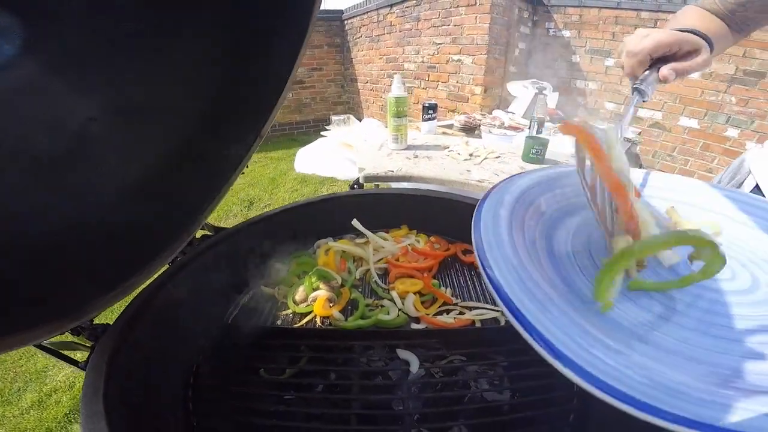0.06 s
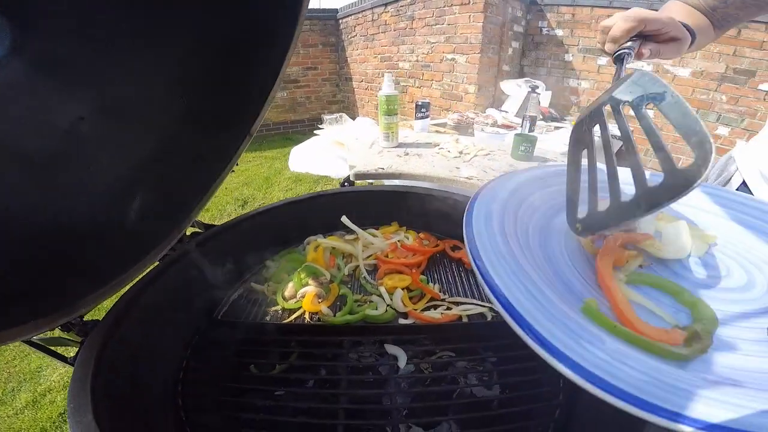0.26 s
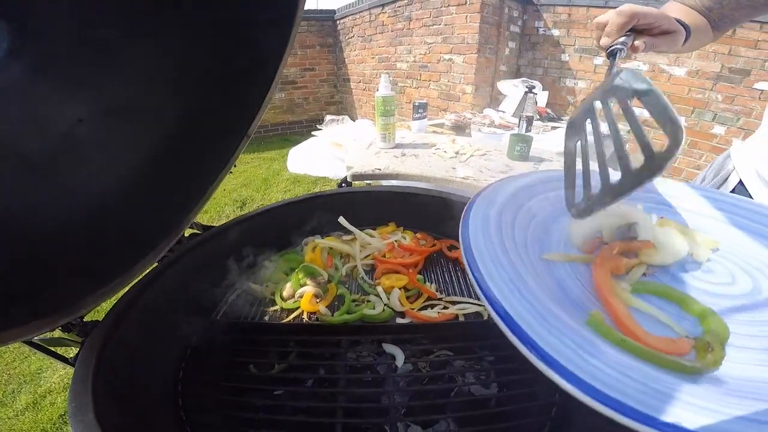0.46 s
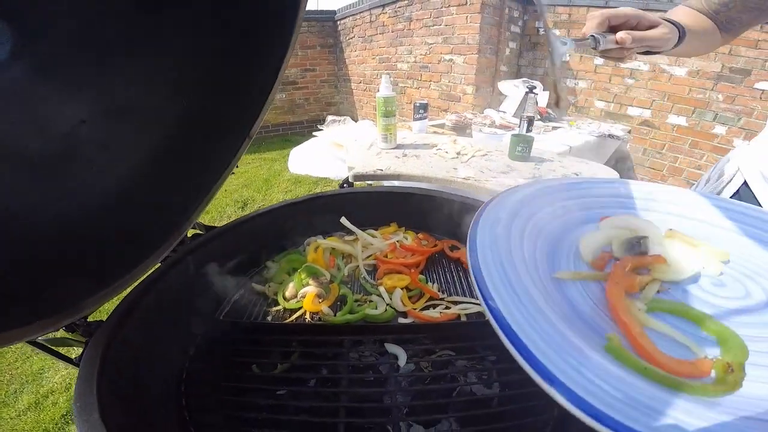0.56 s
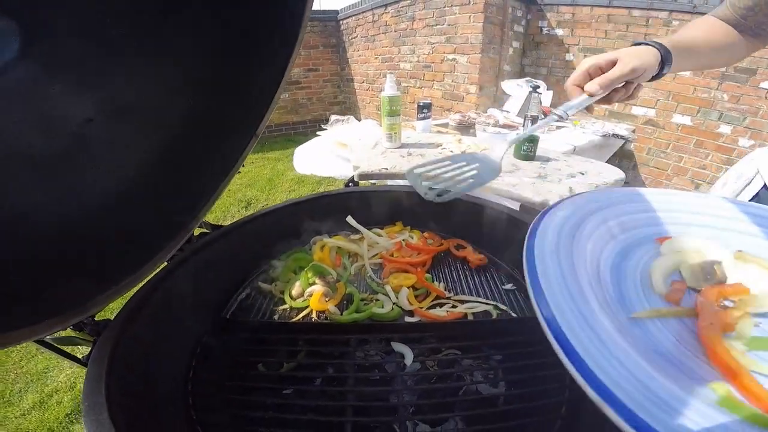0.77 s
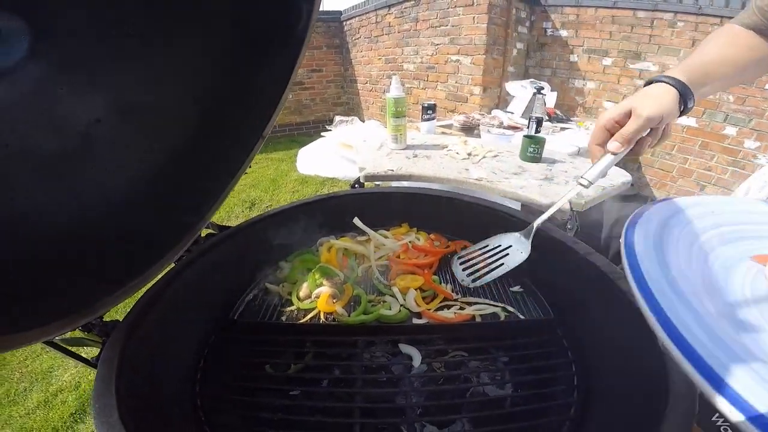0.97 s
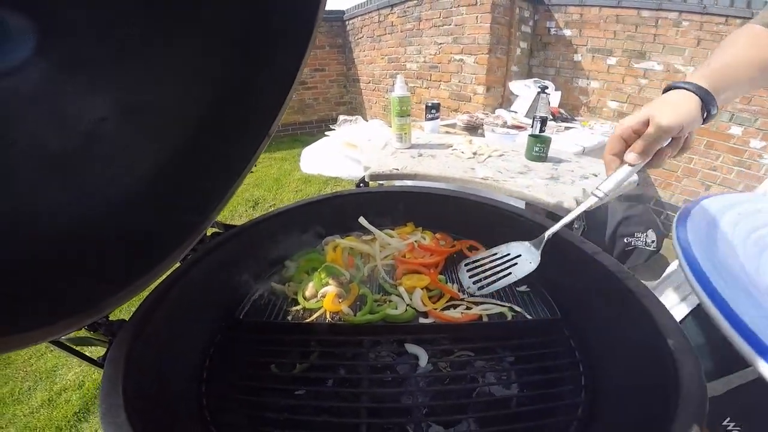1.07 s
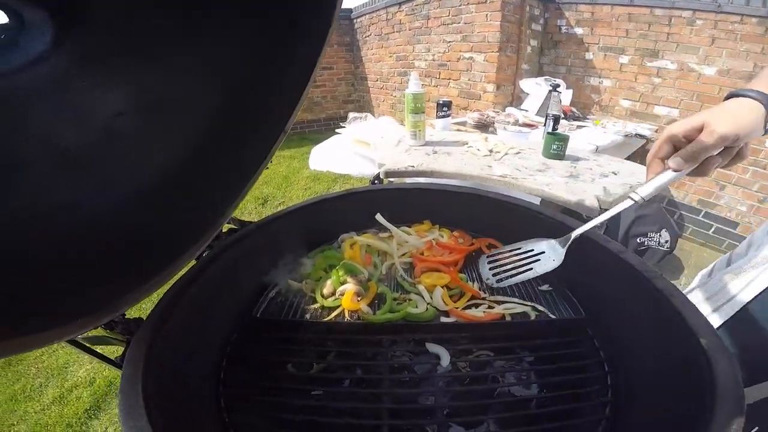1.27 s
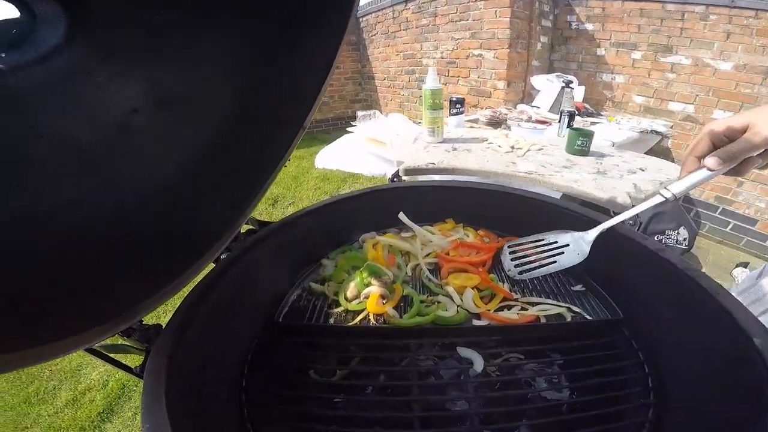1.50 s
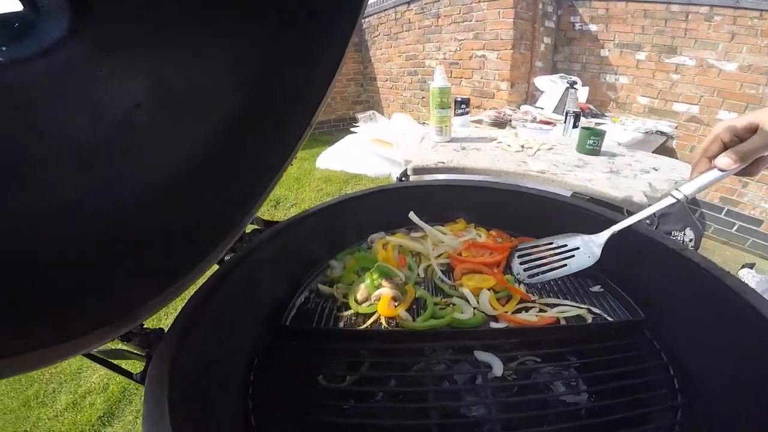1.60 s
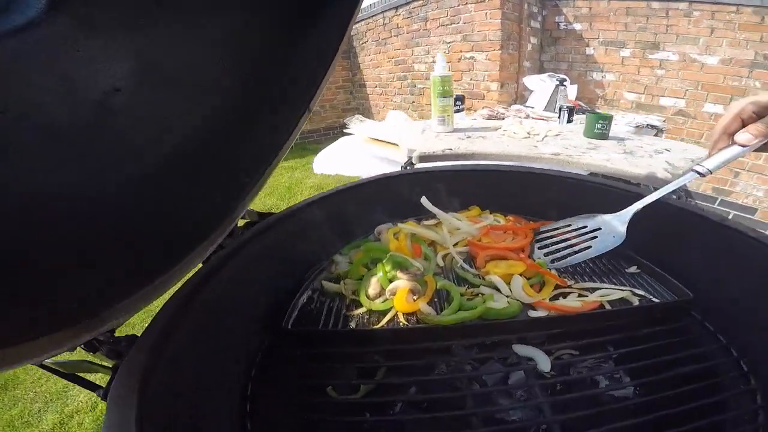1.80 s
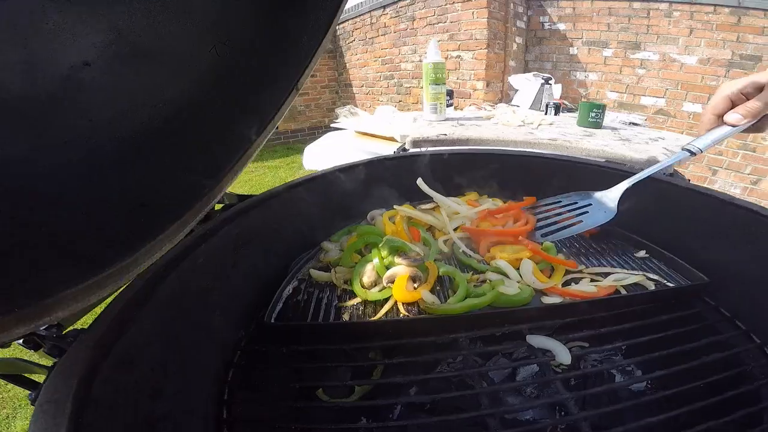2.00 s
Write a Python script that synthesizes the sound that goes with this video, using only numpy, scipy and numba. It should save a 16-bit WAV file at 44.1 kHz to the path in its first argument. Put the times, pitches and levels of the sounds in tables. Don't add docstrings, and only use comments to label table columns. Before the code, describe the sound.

Slotted metal turner clacks against a plate, then clanks on grill bars over faint sizzling outdoors

```python
import sys
import numpy as np
from scipy import signal
from scipy.io import wavfile
from scipy.ndimage import uniform_filter1d
from numba import njit

SR = 44100
rng = np.random.default_rng(int(sys.argv[2]) if len(sys.argv) > 2 else 0)


def unload_audio(sound):
    columns = np.transpose(np.atleast_2d(sound))
    steps = np.round(np.clip(columns, -1, 1) * 32767)
    wavfile.write(sys.argv[1], SR, steps.astype(np.int16))


def invert_db(level):
    return 10 ** (np.asarray(level, dtype=float) / 20)


N = 90404

# t/s, peak level/dB, contact time/s, clatter level/dB, share of the kettle/dB
GRATE_TAPS = [
    (1.1024, -20.5, 0.0017, -14, -25.5),
    (1.3967, 1.5, 0.00183, -23.5, -42.5),
    (1.697, -13, 0.00292, -11.5, -22),
    (1.7372, 1.5, 0.00095, -22.5, -39.5),
]
BARS_HZ = [549, 660, 990, 1227, 1675, 1933, 2021, 2160, 2430, 2850, 3117, 3210, 3547, 3716]
BARS_T60 = [0.098, 0.048, 0.085, 0.038, 0.18, 0.075, 0.093, 0.11, 0.1, 0.026, 0.11, 0.15, 0.038, 0.062]


def level(x, db):
    return x * invert_db(db) / np.sqrt(np.mean(x ** 2))


def band(x, hz, width):
    half = np.sqrt(1 + (width / hz / 2) ** 2) + width / hz / 2
    edges = [hz / half, min(hz * half, SR / 2.1)]
    return signal.sosfilt(signal.butter(2, edges, "band", fs=SR, output="sos"), x)


def walk(rate):
    hold = int(SR / rate)
    steps = np.repeat(rng.standard_normal(N // hold + 1), hold)
    return 1.3 * uniform_filter1d(uniform_filter1d(steps, hold), hold)[:N]


def add(out, at_s, x):
    i = int(at_s * SR)
    out[i:i + len(x)] += x[:N - i]


def fade(t, t60):
    return 1000. ** (-t / t60)


def ring(hz, db, t60, length_s=1.0):
    t = np.arange(int(length_s * SR)) / SR
    turn = rng.random((len(hz), 1))
    hz, db, t60 = (np.array(v, float)[:, None] for v in (hz, db, t60))
    partials = invert_db(db) * np.sin(2 * np.pi * (hz * t + turn)) * fade(t, np.clip(t60, .01, 1.2))
    return np.sum(partials, axis=0)


def coloured(points, flicker_db):
    hz, db = np.array(points, float).T
    count = int(3 * np.log2(hz[-1] / hz[0])) + 1
    out = np.zeros(N)
    for f in np.geomspace(hz[0], hz[-1], num=count):
        band_db = np.interp(np.log(f), np.log(hz), db) + flicker_db * walk(11.36)
        out += invert_db(band_db) * band(rng.standard_normal(N), f, f / 4)
    return out


def blows(hits, rings, clatter):
    out, t = np.zeros(N), np.arange(SR // 2) / SR
    crack = invert_db(-2) * fade(t, 0.078)
    for (at_s, peak_db, contact_s, clatter_db, *_), bodies in zip(hits, rings):
        blow = bodies / 2
        for f, db, t60 in clatter:
            noise = band(band(rng.standard_normal(len(t)), f, 0.6 * f), f, f)
            add(blow, 0, level(noise, db + clatter_db - 6.5) * (crack + fade(t, t60)))
        contact = np.minimum(np.arange(len(blow)) / SR / contact_s, 1) ** 1.12
        add(out, at_s, invert_db(peak_db) * blow * contact)
    return out


def sizzle():
    # f/Hz, density/dB
    hiss_bands = [(1500, -11), (2500, 0), (4000, 0), (5500, 2), (7000, -7.5), (10000, -4), (13000, -4.5),
                  (15500, -13)]
    bubbles_per_s = 530
    bursts = rng.random(N) < bubbles_per_s / SR
    pops = bursts * invert_db(2 * rng.exponential(size=N)) * np.sign(rng.standard_normal(N))
    return level(coloured(hiss_bands, 1.5), -46) + level(band(pops, 4320, 4550), -52)


def garden_air():
    # f/Hz, density/dB
    air_bands = [(25, -3.5), (60, -2.5), (125, -9), (175, -14.5), (400, -29.5), (600, -26), (1200, -31),
                 (2500, -36.5)]
    return level(coloured(air_bands, 3.3), -40.5)


def breeze():
    # t/s, level/dB
    gusts = [
        (0, 1),
        (.4, 0.5),
        (.62, -1),
        (.95, 0),
        (1.3, -0.5),
        (1.6, 3),
        (2.05, 5.5),
    ]
    return invert_db(np.interp(np.arange(N) / SR, *np.array(gusts).T))


def far_engine():
    # t/s, firing f/Hz, level/dB
    path = [
        (0, 86.2, -39),
        (.2, 83.43, -36.5),
        (.5, 84.56, -42.5),
        (.8, 79.48, -43),
        (1.05, 86.06, -46),
        (1.299, 76.46, -37),
        (1.5, 70.2, -46.5),
        (1.8, 64.7, -38.5),
        (2.05, 63.2, -41),
    ]
    t, (at_s, hz, db) = np.arange(N) / SR, np.array(path).T
    firing_hz = np.interp(t, at_s, hz) * (1 + 0.0098 * walk(15.14))
    engine_db = np.interp(t, at_s, db) + 2.0 + 0.57 * walk(20.5)
    return invert_db(engine_db) * np.sin(2 * np.pi * np.cumsum(firing_hz) / SR)


def slides():
    # t/s, length/s, level/dB, colour f/Hz
    strokes = [
        (.03, 0.03, -38, 4700),
        (.44, 0.028, -39.5, 8000),
        (1.091, 0.0407, -29, 2850),
        (1.093, 0.043, -32.5, 12400),
    ]
    scraped_db = [-5.5, -6.5, -12, -5, -30, -3.5, -33, -10.5, -12, -24, -6, -18, -35, -4.5]
    out, size = np.zeros(N), SR // 4
    bars = ring(BARS_HZ, scraped_db, BARS_T60)
    for k, (at_s, length_s, db, hz) in enumerate(strokes):
        grains = rng.standard_normal(size) * invert_db(0.5 * rng.exponential(size=size))
        phase = np.minimum(np.arange(size) / SR / length_s, 1)
        stroke = np.abs(np.sin(np.pi * phase)) ** 0.15 * (1 - phase) ** .5
        grit = level(grains, 0) * stroke * invert_db(2 * walk(217)[:size])
        add(out, at_s, invert_db(db) * band(grit, hz, 1.45 * hz))
        if k == 2:
            rung = signal.fftconvolve(grit * (1 - phase) ** 0.24, bars)
            loudest = np.sqrt(np.max(uniform_filter1d(rung ** 2, size=900)))
            add(out, at_s, invert_db(-26.5) * rung / loudest)
    return out


def spits():
    # t/s, peak level/dB, colour f/Hz, bandwidth as share of the colour
    noise_pops = [(0.275, -29.5, 1028, 1.25), (0.279, -32, 1480, 0.69), (0.49, -6, 705, 1.15),
                  (.345, -33.5, 510, 2.6), (.684, -38, 12500, .5), (.686, -43, 3200, .4), (.698, -40, 13600, .5),
                  (.73, -41, 12500, .4), (.746, -33.5, 9000, 1.3), (.774, -42, 9500, .3),
                  (.785, -29.5, 4000, 0.8), (0.806, -33, 4000, .6), (0.816, -39, 5500, 0.26),
                  (.871, -35, 11300, .6), (0.882, -32, 4360, 0.46), (.909, -30.5, 4000, 0.49),
                  (1.079, -30, 4660, 0.64), (1.1033, -12.5, 680, 0.53), (1.093, -25, 4000, 0.7),
                  (1.104, -23, 12570, 0.35), (1.309, -33.5, 2200, 1.1), (1.566, -27, 3800, 0.95),
                  (.152, -17, 208, 0.82), (0.058, -46, 3000, .4), (.325, -37, 2750, .3)]
    out, t = np.zeros(N), np.arange(2000) / SR
    for at_s, db, hz, share in noise_pops:
        burst = rng.standard_normal(len(t)) * np.sqrt(t) * fade(t, 0.0095)
        pop = band(burst, hz, share * hz)
        add(out, at_s - .001, invert_db(db) * pop / np.abs(pop).max())
    return out


def plate_knocks():
    # t/s, peak level/dB, contact time/s, clatter level/dB
    knocks = [
        (.1511, 9, 0.0012, -22),
        (.4885, 9, 0.0014, -19.5),
    ]
    # f/Hz, level/dB, t60/s
    clatter = [(175, -9, 0.057), (390, -9, 0.023), (797, -10.5, 0.033), (2010, -13, 0.28), (4000, -2, 0.12),
               (7160, -9.5, 0.071), (11500, -3, 0.065), (15050, -30, 0.038)]
    # f/Hz; t60/s; level/dB, one row per knock
    plate_hz = [165, 1066, 1735, 1764, 2620, 2850, 3402, 3360, 4515, 4597, 4893, 5965, 6775, 10700]
    plate_t60 = [0.034, 0.074, 0.027, 0.054, 0.046, 0.039, 0.095, 0.047, 0.076, 0.036, 0.016, 0.05, 0.04,
                 0.049]
    plate_db = [
        [-19, -3.5, -2.5, 4, -15.5, -27, -6, -9, -9, -2, -8, -21, -14.5, -19],
        [-10, -8.5, -8.5, -1, -1, -3, -25, -7.5, -12, -3, -7, -12.5, -20, -23],
    ]
    # f/Hz; t60/s; level/dB, one row per knock
    turner_hz = [1066, 1314, 1755, 2051, 3607, 4594, 5243, 5649, 5782, 6535, 8040, 9803, 10010]
    turner_t60 = [0.15, 0.23, 0.46, 0.3, 0.98, 0.27, 0.15, 0.35, 0.15, 0.13, 0.1, 0.14, 0.16]
    turner_db = [
        [-21.5, -58, -38.5, -50.5, -54.5, -37, -39.5, -46.5, -34.5, -26.5, -59, -44.5, -45.5],
        [-17.5, -38, -37, -34, -43, -26.5, -26.5, -27, -22, -49, -29, -38, -28],
    ]
    # f/Hz; t60/s; level/dB, one row per knock
    rim_hz = [310, 700, 1920, 2075, 2740, 3070, 3450, 3667, 3785, 4340, 4430, 4750]
    rim_t60 = [0.033, 0.02, 0.045, .06, 0.04, 0.049, .05, 0.045, 0.032, 0.061, 0.041, 0.046]
    rim_db = [
        [-27.5, -30, -6, -15.5, -26.5, -30, -13, -26, -24.5, -25, -17.5, -13],
        [-15, -6, -17, -30, -8.5, -23, -11, -24, -14, -11, -8, -22],
    ]
    rings = [ring(plate_hz, a, plate_t60) + ring(turner_hz, b, turner_t60) + ring(rim_hz, c, rim_t60)
             for a, b, c in zip(plate_db, turner_db, rim_db)]
    return blows(knocks, rings, clatter)


def blade_brushes():
    # t/s, length/s, level/dB, skew (under 1 peaks early)
    brushes = [
        (.692, 0.073, -40.5, .9),
        (.778, 0.1, -46.5, 0.31),
    ]
    out, t = np.zeros(N), np.arange(SR // 4) / SR
    for at_s, length_s, db, skew in brushes:
        swell = np.abs(np.sin(np.pi * np.minimum(t / length_s, 1) ** skew)) ** 0.62
        add(out, at_s, invert_db(db) * np.sin(2 * np.pi * 3630 * t) * swell)
    return out


def grate_taps():
    # f/Hz, level/dB, t60/s
    clatter = [(144.2, -16.5, 0.39), (246, -6.5, 0.39), (770, -9, 0.43), (1330, -2, 0.41), (2200, 0, 0.32),
               (3720, 3, 0.2), (6140, -5, .1), (8750, -9, 0.076), (13700, -10, 0.23)]
    # level/dB, one row per tap
    bars_db = [
        [-24, -11, -27, -3, -34, -13, -26, -16, -5, -25, -11, -31, -23, -13],
        [-12.5, -5, -20, -7, -16.5, -20, -26, -12.5, -8, -8, -8.5, -19, 1, 2],
        [3, 2, -3, -7, -18, -21, -11, -9, 2, -3, 1, -5, -7, 0],
        [-15.5, -4, -43, -3, -15.5, -41, -4.5, -29, -7, 0.5, -16, -26, -5, -13],
    ]
    # f/Hz; t60/s; level/dB, one row per tap
    blade_hz = [1015, 2552, 3880, 4021, 4414, 4612, 5270, 5430, 6115]
    blade_t60 = [0.11, 0.052, 0.057, 0.078, 0.077, 0.047, 0.051, 0.049, 0.1]
    blade_db = [
        [-2, -1, -26, -18, -22, -27, -5, -11, -14],
        [-12.5, -17, -8, -35, -14.5, -20, -34, -20, -35],
        [-6, -28, 1.5, -27, -29, -8, -19, 0.5, -12],
        [-23, -6, -3, -34, -22, -3.5, -15, -20, -26],
    ]
    # f/Hz; t60/s; level/dB, one row per tap
    rods_hz = [735, 876, 1340, 1564, 1846, 2083, 2233, 2379, 2821, 3144, 3225, 3930, 4409, 4953]
    rods_t60 = [0.08, 0.19, 0.26, .15, 0.23, 0.23, 0.098, 0.11, 0.24, 0.13, 0.29, 0.14, 0.21, 0.11]
    rods_db = [
        [5, -12, -14, -36, -33, -31, -29, -20, -29, -17, -27, -7, -25, -10],
        [-15.5, -25, -22, -24, -25, -26, -16, -22, -26.5, -9, -24, -37, -24, -35],
        [-25, -26, -17, -18, -26, -32, -9, -15, -14, -21, -18, -20, -33, -25],
        [-9, -45, -24.5, -21, -36, -32, -11, -9, -26, -17, -26, -13.5, -38, -20],
    ]
    thin_band = [345, 465]
    rings = [ring(BARS_HZ, a, BARS_T60) + ring(blade_hz, b, blade_t60) + ring(rods_hz, c, rods_t60)
             for a, b, c in zip(bars_db, blade_db, rods_db)]
    gap = signal.butter(2, thin_band, "bandstop", fs=SR, output="sos")
    return signal.sosfilt(gap, blows(GRATE_TAPS, rings, clatter))


def kettle():
    # f/Hz; t60/s; level/dB, one row per tap
    bowl_hz = [525, 547, 573, 650, 1238, 1310]
    bowl_t60 = [.5, 1, 1.2, 0.25, 0.45, 0.6]
    bowl_db = [
        [7, -5, -1.5, -12, 2, -5],
        [7.5, -5, 0.5, 1, -1, 9],
        [-2, -5, -4.5, -21, -17, -14],
        [-10, -2, 1, -4, 3.5, -7],
    ]
    out = np.zeros(N)
    for (at_s, db, contact_s, _, share_db), parts_db in zip(GRATE_TAPS, bowl_db):
        add(out, at_s + contact_s, invert_db(db + share_db) * ring(bowl_hz, parts_db, bowl_t60))
    return out * invert_db(4 * walk(30.14))


def scene():
    background = breeze() * (sizzle() + garden_air()) + far_engine()
    blade = slides() + blade_brushes()
    struck = plate_knocks() + grate_taps() + kettle()
    return (background + blade + spits() + struck)[None]


@njit
def follow(x, attack, release):
    y, e = np.empty(len(x)), 0.
    for i in range(len(x)):
        e += (abs(x[i]) - e) * (attack if abs(x[i]) > e else release)
        y[i] = e
    return y


def band_limit(x):
    return signal.sosfilt(signal.butter(12, 16650, fs=SR, output="sos"), x)


def record(dry):
    duck_from_db, duck_share, attack_s, release_s = -23, 0.23, 0.0037, 0.26
    envelope = follow(dry[0], 1 / (attack_s * SR), 1 / (release_s * SR))
    gain = np.minimum(invert_db(duck_from_db) / (envelope + 1e-9), 1) ** duck_share
    clipped = np.clip(dry * gain, -.9, .9)
    top_cut = signal.ellip(6, .5, 45, 15350, fs=SR, output="sos")
    return band_limit(signal.sosfilt(top_cut, clipped))


dry = scene()
out = record(dry)
unload_audio(out)
```